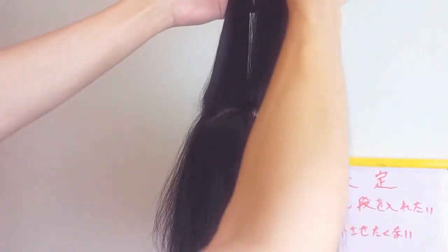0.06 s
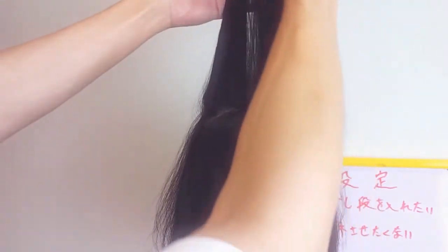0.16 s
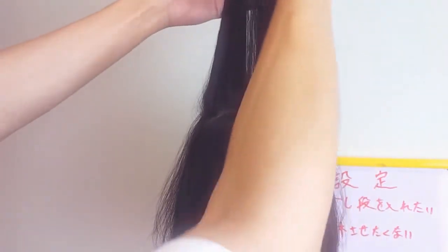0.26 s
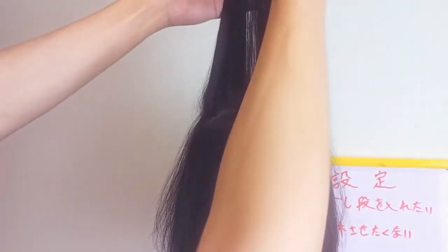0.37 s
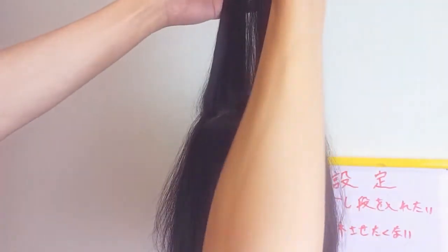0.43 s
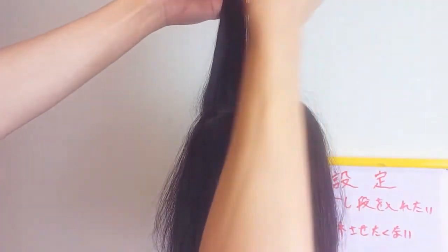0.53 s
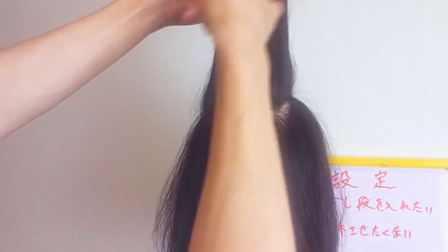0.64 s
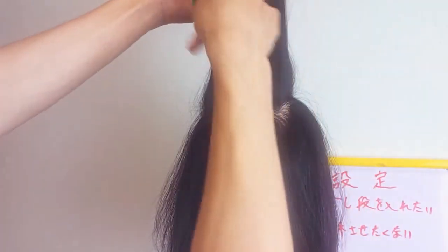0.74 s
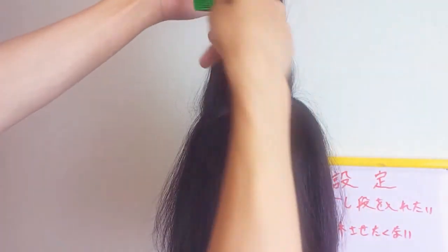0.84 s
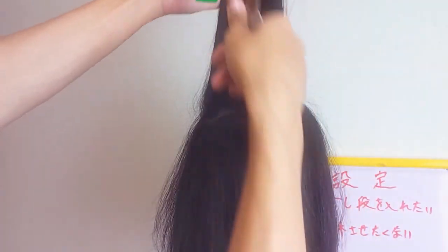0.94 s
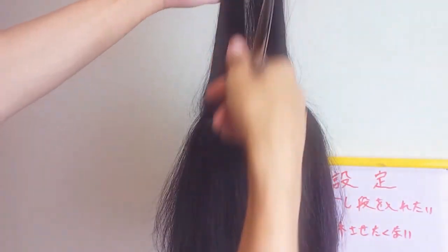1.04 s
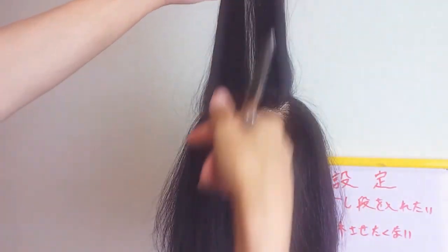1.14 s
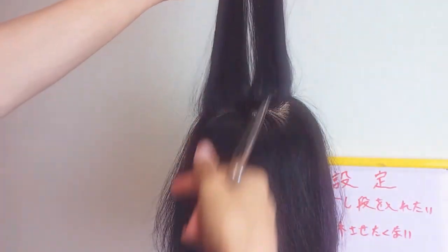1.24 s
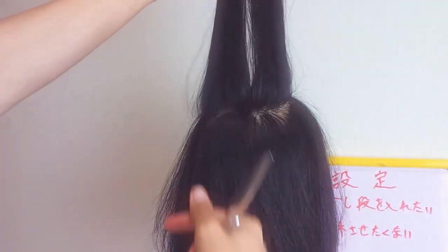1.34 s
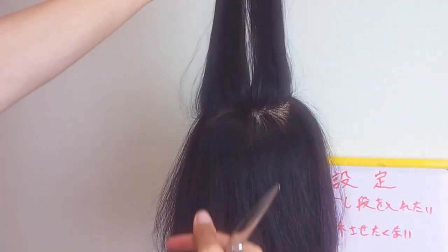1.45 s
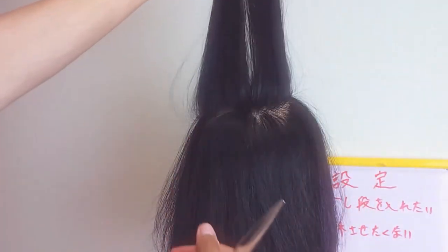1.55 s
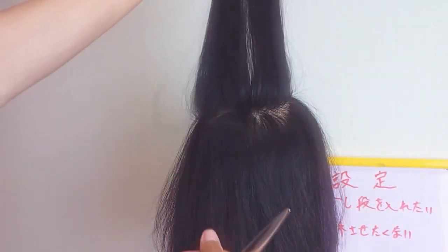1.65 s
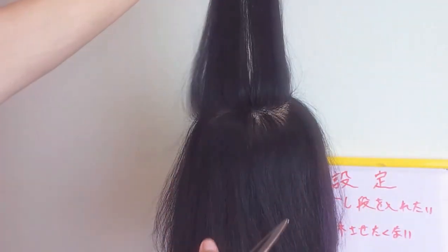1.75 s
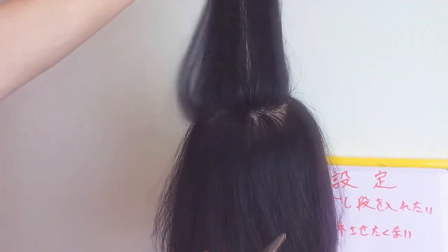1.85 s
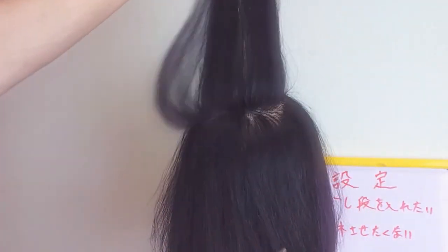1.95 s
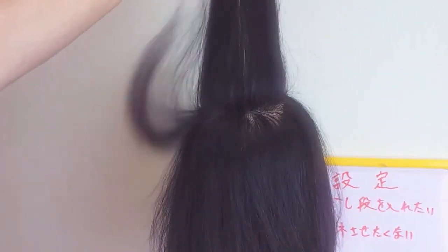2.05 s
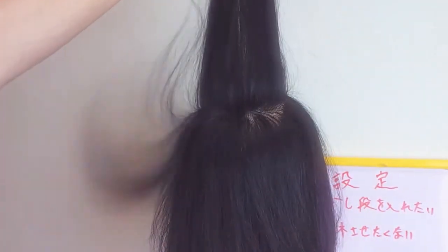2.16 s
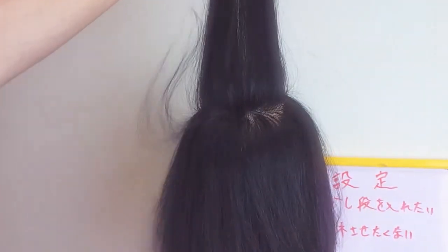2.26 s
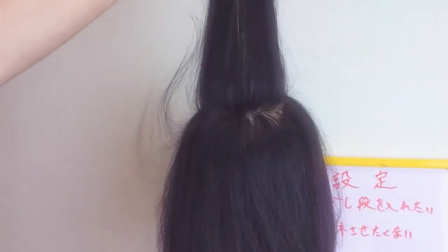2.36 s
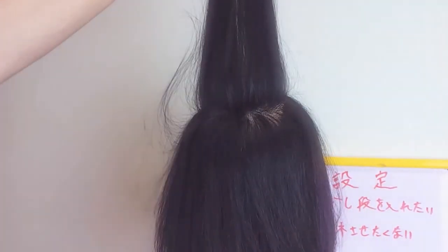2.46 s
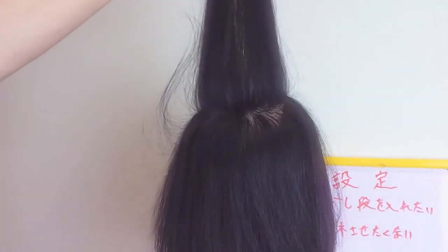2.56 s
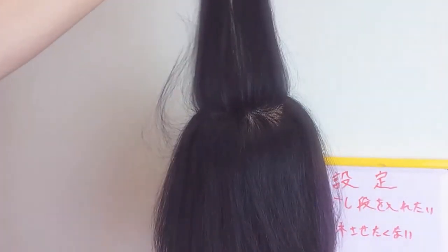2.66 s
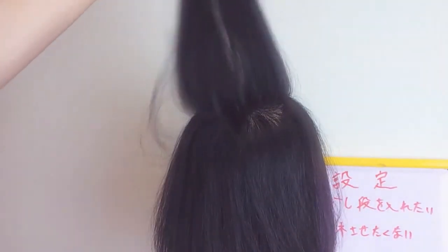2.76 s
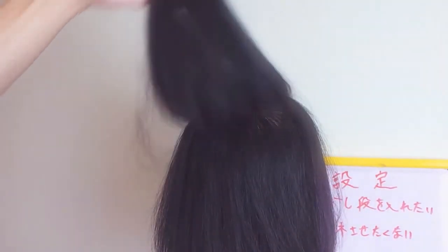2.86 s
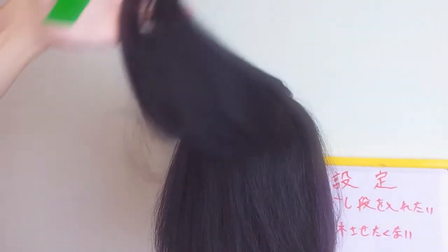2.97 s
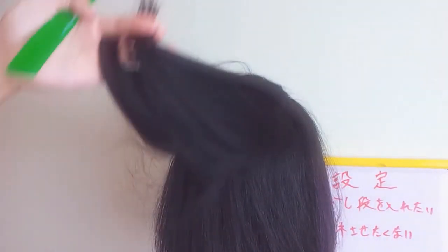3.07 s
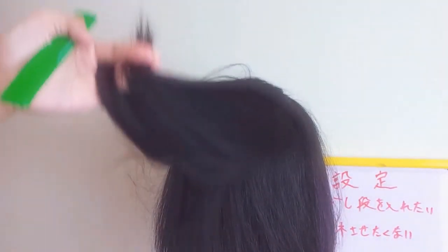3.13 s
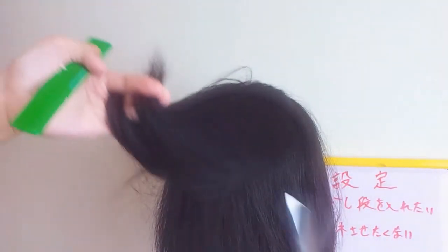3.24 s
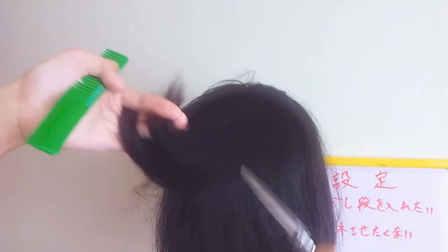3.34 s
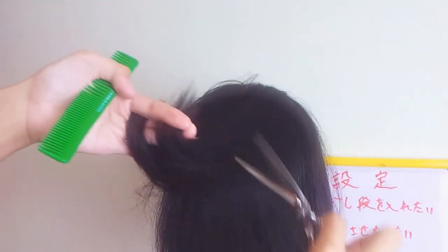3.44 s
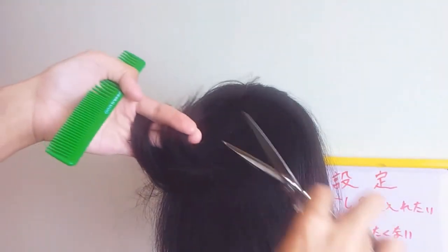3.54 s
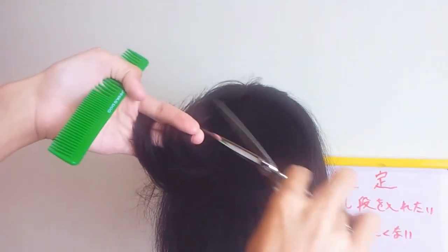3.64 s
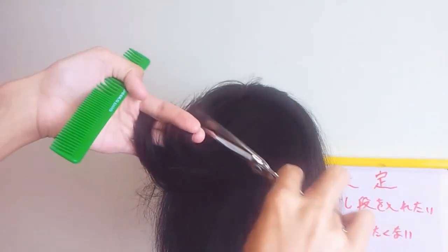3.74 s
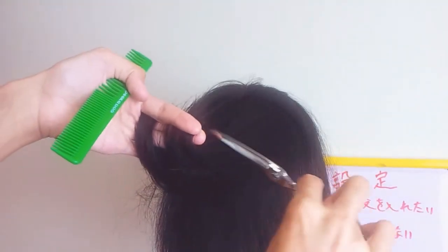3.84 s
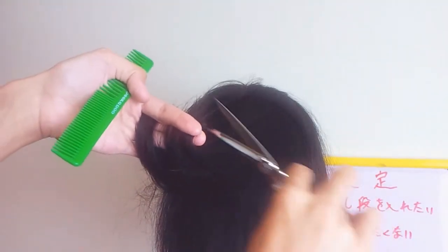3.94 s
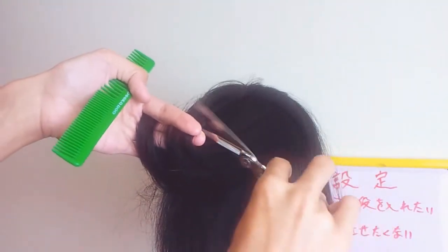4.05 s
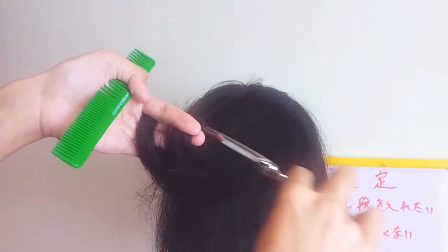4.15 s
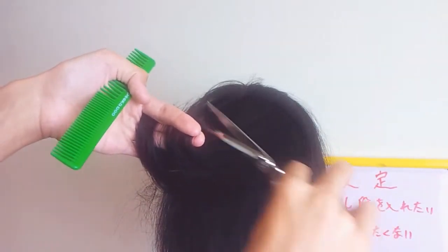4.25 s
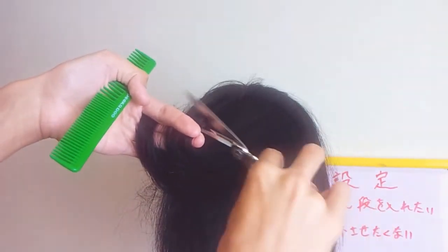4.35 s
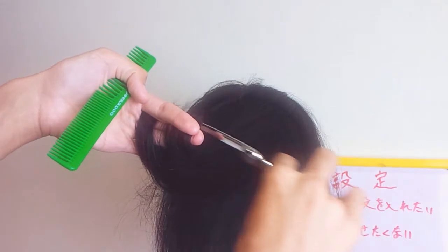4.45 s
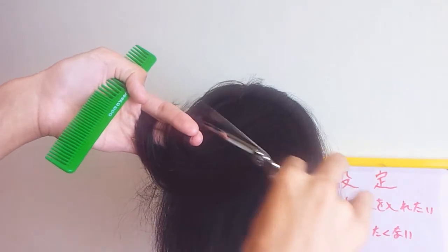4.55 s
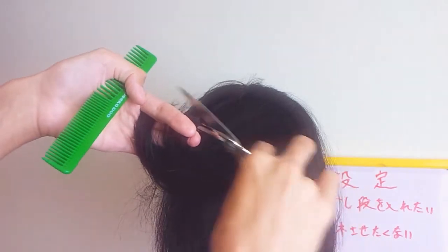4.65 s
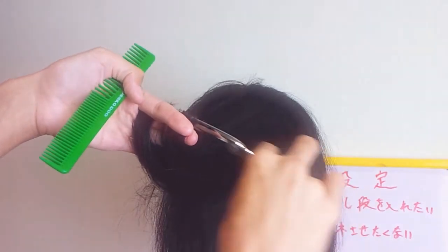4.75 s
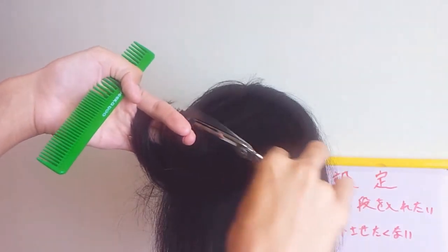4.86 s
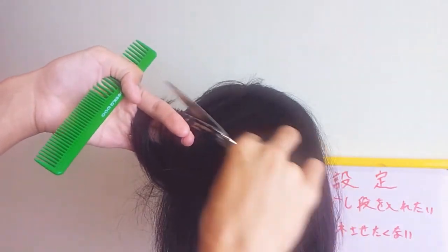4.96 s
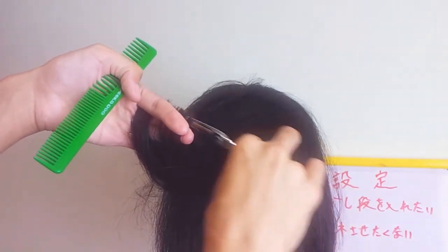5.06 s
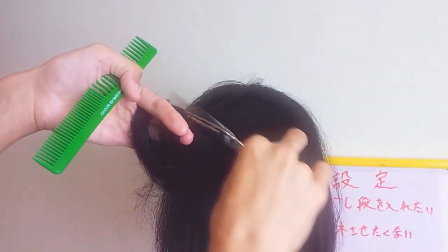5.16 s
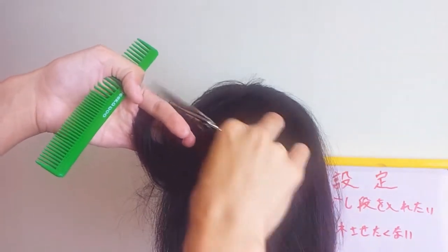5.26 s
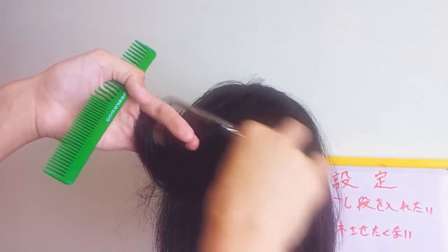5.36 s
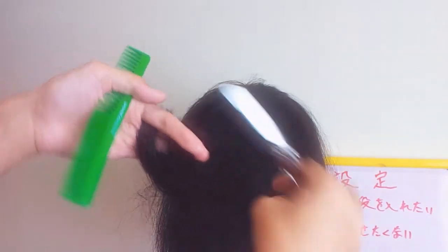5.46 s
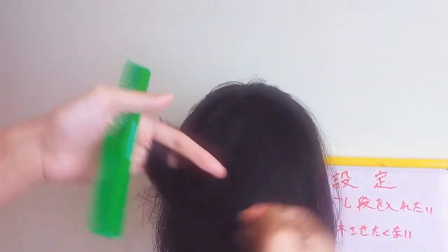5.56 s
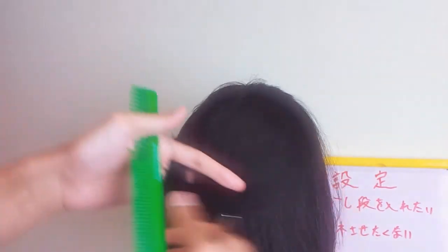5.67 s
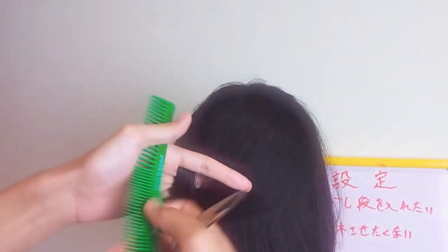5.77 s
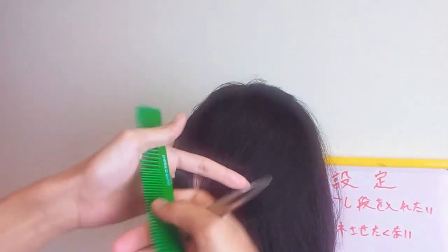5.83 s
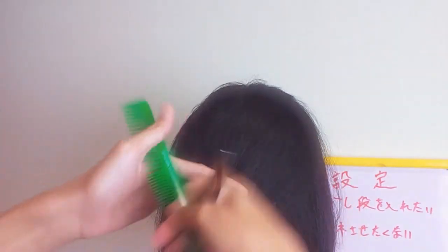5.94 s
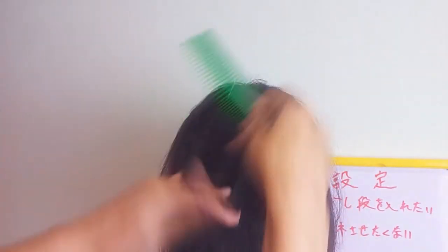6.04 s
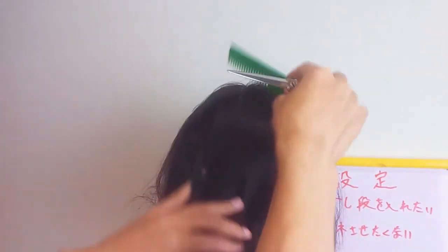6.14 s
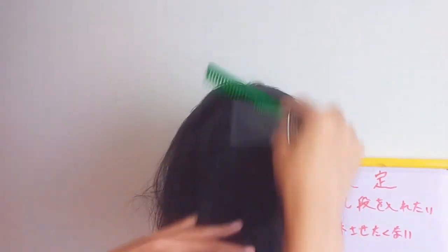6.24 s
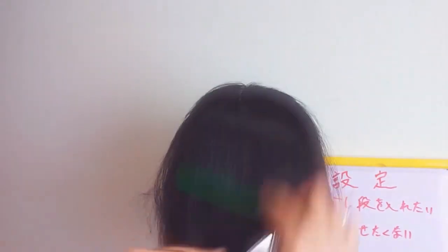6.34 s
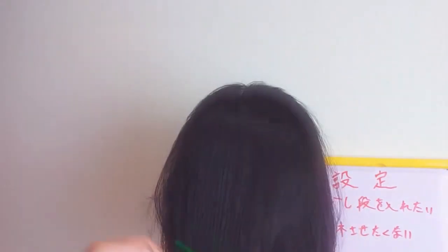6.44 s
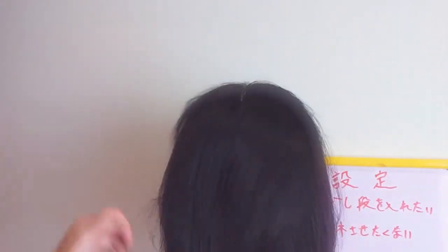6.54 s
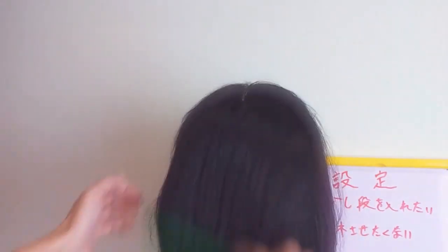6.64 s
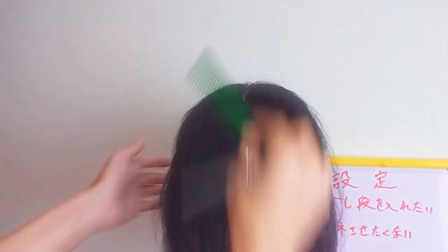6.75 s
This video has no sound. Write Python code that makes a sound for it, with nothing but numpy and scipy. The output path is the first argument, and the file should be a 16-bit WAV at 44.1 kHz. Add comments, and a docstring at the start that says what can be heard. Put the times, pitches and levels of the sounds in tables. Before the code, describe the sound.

Hairdressing scissors snip hair in a quick run of bright clicks, then the handles clack and a comb strokes through twice in a small room.

```python
"""Faint ticks of steel, then a first snip: hairdressing scissors, close to one microphone in a small room.
After a pause seven more snips cut a lifted section of hair, each a short rasp of sliding blades that
ends in a bright click; the room rings on. The loose handles clack, then a comb knocks on the hollow
practice head and is drawn twice through the hair. Far back in the quiet, a fan hums faintly."""
import sys
import numpy as np
from scipy import signal
from scipy.fft import rfft, irfft
from scipy.io import wavfile

SR = 44100
rng = np.random.default_rng(int(sys.argv[2]) if len(sys.argv) > 2 else 0)


def to_wav(s):
    """Save 16-bit WAV."""
    ch = np.atleast_2d(s).T  # columns
    pcm = np.round(np.clip(ch, -1, 1) * 32767)  # PCM
    wavfile.write(sys.argv[1], SR, pcm.astype(np.int16))


N = 299880
TIME = np.arange(N) / SR
BINS = abs(np.fft.fftfreq(4096, 1 / SR))  # frequencies of every filter curve, in Hz


# Snips, close to the microphone. Each row: moment the blades shut in seconds, click level in dB, blade
# pitch in Hz, room and ring relative to the click in dB, shelf above 12 kHz in dB, cutting time in
# seconds, rasp of the edges in dB, crunch of the hair in dB.
SNIPS = [ (0.3902, -27, 8870, 0, -7, 0.0027, -56, -74), (2.8879, -21.5, 11500, -0.5, 1, 0.021, -52.5, -83),
         (3.383, -14, 12120, -6, 4, .029, -43, -61.5), (3.7118, -16, 10950, -7.5, 3.5, 0.024, -40.5, -54.5),
         (4.027, -22, 10750, -6.5, -3, .026, -45, -50), (4.3321, -31, 10240, -8, -3, 0.023, -51, -55),
         (4.627, -20.5, 10750, -5.5, 1, 0.018965, -48, -53),
         (4.885, -30, 10600, -3.5, -0.5, .019, -57, -63)]
# Light touches of the blades. Each row: start in seconds, level in dB, blade pitch in Hz, room and ring
# relative to the touch in dB.
TICKS = [(0.029, -58, 11800, 1), (0.0914, -51.5, 3180, 2), (2.5118, -57, 9830, -12),
         (2.6504, -51.5, 12100, -2), (5.0749, -58, 10800, 5.5), (5.5111, -46, 11090, -4),
         (5.734, -59, 10900, 2)]
# The ring of the blades. Each row: frequency in Hz, relative level in dB, time to fall 60 dB in seconds.
BLADE_MODES = [(6575, -26.5, .18), (8800, -8, 0.3), (9000, -8, 0.25), (9700, -1, .25), (10356, -1, 0.18),
               (10734, -5, 0.33), (11000, -1, .28), (11970, -30, 0.21), (12100, -15, 0.28),
               (12400, -16.5, 0.27), (13090, 3, 0.2), (15000, -16, .19)]

def blade_clicks(chatter_s=0.00053, ring_db=-35, shiver_db=-16, shiver_t60=0.07, echo_db=-8.5):
    """The blades hit their stop, shiver and ring. Returns the close sound and what goes to the room."""
    t = np.arange(SR // 2) / SR
    near, to_room = np.zeros(N), np.zeros(N)
    hits = [(*row[:5], 1, 8) for row in SNIPS] + [(*row, -9, 9, 12) for row in TICKS]
    for start, db, pitch_hz, room_db, top_db, body_db, emphasis_db in hits:
        flex_db = hump(4570, 1700, 1.04 * max(db + 22, 0))  # a snip above -22 dB flexes the whole blade
        curve_db = steel(body_db, top_db) + flex_db + contact_ripple(depth_db=1.9, width_hz=170)
        pitched_db = curve_db + hump(pitch_hz, 380, emphasis_db)
        shiver = unit_rms(colour(rng.standard_normal(len(t)), pitched_db))
        shiver *= gain_of(shiver_db - 60 * t / shiver_t60)
        click = contact(pitched_db, t, chatter_s)
        ringing = gain_of(room_db + ring_db) * ring(BLADE_MODES, t)
        add(near, start, gain_of(db) * (click + shiver + ringing))
        for delay_s in (0.0027, 0.0039):  # small surfaces nearby return mostly treble
            echo = contact(steel(body_db - 9, top_db), t, chatter_s)
            add(near, start + delay_s, gain_of(db + echo_db) * echo)
        add(to_room, start, gain_of(db + room_db) * contact((curve_db + pitched_db) / 2, t, chatter_s))
    return near, to_room


# The colour of the steel from close by. Each row: frequency in Hz, relative level in dB.
STEEL_SPECTRUM = [(300, -41), (1000, -44.5), (1600, -43.5), (2500, -22), (3500, -29), (4200, -22),
                  (5600, -19), (7800, -16.5), (8800, -10.5), (10600, -3), (12000, -9.5), (13500, -3.5),
                  (14300, -7), (16000, -16.5)]
# Broad resonances of the blades. Each row: centre in Hz, half width in Hz, gain in dB.
STEEL_RESONANCES = [(2404, 130, -8), (4330, 140, 4), (5380, 310, 1), (6620, 190, 7), (8920, 140, 7.5),
                    (10980, 135, 4), (12560, 600, 4.5)]

def steel(body_db, top_db):
    """The resonant blades as a curve in dB, with shelves below 8 kHz (body) and above 12 kHz (top)."""
    shelves = curve([(1400, 2.6 * body_db), (5000, body_db), (9000, 0), (11500, 0.0088), (14500, top_db)])
    return curve(STEEL_SPECTRUM) + sum(hump(*row) for row in STEEL_RESONANCES) + shelves


# The blades are drawn open between snips. Each row: start in seconds, level in dB.
OPENINGS = [(2.748, -61.5), (4.443, -63)]

def blade_slides(glide_s=0.036, glide_db=-69, overrun_s=0.0025, opening_s=0.032):
    """The blades glide up to the hair, then crunch and rasp to the click; twice they whisper open."""
    out = np.zeros(N)
    for shut, *_, cut_s, rasp_db, crunch_db in SNIPS:
        edges = gain_of(rasp_db) * edge_rasp(cut_s + overrun_s, growth_db=14)
        hair = gain_of(crunch_db) * hair_crunch(cut_s + overrun_s)
        add(out, shut - cut_s, edges + hair)
        if cut_s > 0.01:  # a nip with the very tips has no run-up
            glide = edge_rasp(glide_s + overrun_s, growth_db=8)
            add(out, shut - cut_s - glide_s, gain_of(glide_db) * glide)
    for start, db in OPENINGS:
        add(out, start, gain_of(db) * edge_rasp(opening_s, growth_db=6))
    return out


def edge_rasp(length_s, growth_db):
    """Edge grinds on edge, harder as the blades move on."""
    snaps, travel = friction(length_s, steel(body_db=-0.86, top_db=0.885))
    return unit_rms(snaps * gain_of(growth_db * travel) * signal.windows.tukey(len(snaps), 0.2))


# Hair parting between the blades. Each row: frequency in Hz, relative level in dB.
CRUNCH_SPECTRUM = [(1000, -51), (2200, -11), (3000, -3), (4500, -9), (6500, 2.5), (8000, -3.5),
                   (10000, -10), (15000, -11)]

def hair_crunch(length_s, bite=0.37):
    """The hair gives way early in the cut, loudest near the fraction `bite` of the travel."""
    snaps, travel = friction(length_s, curve(CRUNCH_SPECTRUM))
    return unit_rms(snaps * travel * np.exp(-travel / bite) * (1 - travel ** 4))


# The handles, near the microphone, loudest as the scissors are folded into the hand.
# Each row: start in seconds, level in dB, rattling time in seconds.
CLACKS = [(0.09, -55, .003), (5.397, -30, 0.01), (5.4915, -54, .002)]
# Handle striking handle. Each row: frequency in Hz, relative level in dB.
CLACK_SPECTRUM = [(500, -36), (1100, -30), (1350, -9), (2300, -16.5), (2800, -9), (5000, -5), (8500, -5),
                  (9700, 0.5), (11500, 1.5), (14000, -11.5), (16000, -16)]
# The loosely held scissors. Each row: frequency in Hz, relative level in dB, time to fall 60 dB in seconds.
SCISSOR_MODES = [(1480, -7, 0.23), (1963, 1, 0.15), (2773.3, 0.5, 0.29), (4650, -13, 0.17), (5540, 3, .18),
                 (7400, 9, 0.23), (9600, -5, .2), (11050, 2, .18), (11494, -1, .16), (12950, -9, .15),
                 (15300, -10, .15)]

def handle_clacks(chatter_s=0.00071, bounce_s=0.0021, rattle_loss_db=27.5, ring_db=-30):
    """The loose handles bounce on each other and set the whole scissors ringing."""
    t, out = np.arange(SR // 2) / SR, np.zeros(N)
    for start, db, rattle_s in CLACKS:
        for late_s in np.arange(0, rattle_s, bounce_s):
            bounce_db = db - rattle_loss_db * (late_s / rattle_s) ** 2
            add(out, start + late_s, gain_of(bounce_db) * contact(curve(CLACK_SPECTRUM), t, chatter_s))
        add(out, start, gain_of(db + ring_db) * ring(SCISSOR_MODES, t))
    return out


# The comb lands on the practice head, close by. Each row: start in seconds, thud in dB, clack in dB,
# pitch of the clack in Hz, tick of the teeth in dB.
KNOCKS = [(5.789, -54.5, -51.5, 1600, -60), (5.8191, -71, -47, 1650, -50), (6.4219, -52.5, -52.5, 660, -68),
          (6.4979, -43, -49, 600, -70.5), (6.5567, -50.5, -44.5, 2900, -42)]
# The hollow head. Each row: frequency in Hz, relative level in dB, time to fall 60 dB in seconds.
HEAD_MODES = [(128, 3.5, 0.1), (170, -1.5, 0.09), (245, 1, 0.097), (570, -3.5, 0.15)]

def comb_knocks(chatter_s=0.00059, thud_rise_s=0.0099, buzz_db=-8, buzz_t60=0.098):
    """The comb lands: the head thuds, the plastic clacks and the teeth tick and buzz."""
    t, out = np.arange(SR // 4) / SR, np.zeros(N)
    for start, thud_db, clack_db, pitch_hz, tick_db in KNOCKS:
        buzz = unit_rms(colour(rng.standard_normal(len(t)), curve(SWISH_SPECTRUM)))
        buzz *= gain_of(buzz_db - 60 * t / buzz_t60)
        thud = ring(HEAD_MODES, t) * (1 - np.exp(-t / thud_rise_s))
        clack = contact(curve(SCRAPE_SPECTRUM) + hump(pitch_hz, 0.28 * pitch_hz, db=12), t, chatter_s)
        tick = contact(curve(SWISH_SPECTRUM), t, chatter_s) + buzz
        add(out, start, gain_of(thud_db) * thud + gain_of(clack_db) * clack + gain_of(tick_db) * tick)
    return out


# Two strokes with a brief touch between them. Each row: start in seconds, time pressed on the head in
# seconds, time drawn in seconds, rubbing of the head in dB, scrape of the teeth in dB.
STROKES = [(5.791, 0.078, .28, -53, -56.5), (6.417, 0.029, 0.02, -50, -60.5), (6.5, 0.05, 0.25, -48, -58)]
# The rubbed head, scraping teeth and swishing hair. Each row: frequency in Hz, relative level in dB.
RUB_SPECTRUM = [(40, -26), (85, -14), (120, -0.5), (165, 0.5), (250, -12), (400, -12), (900, -45)]
SCRAPE_SPECTRUM = [(200, -16), (470, 2), (600, 1.5), (850, 3.5), (1080, -3.5), (1330, 0.5), (1900, -3),
                   (2300, -7.5), (3000, -8), (4200, -11), (9000, -31)]
SWISH_SPECTRUM = [(1000, -36), (3500, -14), (7000, -4.5), (10500, 1.5), (12500, -0.5), (16000, -9)]

def comb_strokes(drag_db=-71, swish_db=-61, pressed_swish_db=-60.5, rub_fade_db_per_s=118):
    """Teeth first press on the head, rubbing and catching on strands, then swish on through free hair."""
    rub = noise(RUB_SPECTRUM)
    scrape = unit_rms(colour(grains(N, per_s=2000, spread_db=0.5), curve(SCRAPE_SPECTRUM)))
    swish = unit_rms(colour(grains(N, per_s=14000, spread_db=1.5), curve(SWISH_SPECTRUM)))
    out = np.zeros(N)
    for start, press_s, draw_s, rub_db, scrape_db in STROKES:
        t = np.maximum(TIME - start, 0)
        pressed, drawn = comb_grip(t, press_s), comb_grip(t, draw_s)
        out += rub * drawn * gain_of(rub_db - rub_fade_db_per_s * t)
        out += scrape * np.hypot(gain_of(scrape_db) * pressed, gain_of(drag_db) * drawn)
        out += swish * np.hypot(gain_of(pressed_swish_db) * pressed, gain_of(swish_db) * drawn)
    return out


def comb_grip(t, hold_s, attack_s=0.023, lift_db_per_s=223):
    """The level rises as the teeth sink in, holds, and falls as they let go."""
    return np.clip(t / attack_s, 0, 1) * gain_of(-lift_db_per_s * np.maximum(t - hold_s, 0))


def room(x, first_s=0.0039, build_s=0.00042):
    """Dense reflections off the walls of a small room; bass and high treble die soonest."""
    hz, t, spectra = signal.stft(rng.standard_normal(SR // 2), SR, nperseg=256)
    t60 = curve([(200, 0.18), (4000, 0.34), (10000, 0.32), (15000, 0.24)], hz)[:, None]
    level_db = curve([(200, 1.3), (1400, 2.2), (3000, -3.0), (6000, -3.5), (9500, 0.6)], hz)[:, None]
    tail = signal.istft(spectra * gain_of(level_db - 60 * t / t60), SR, nperseg=256)[1]
    tail *= 1 - np.exp(-np.maximum(TIME[:len(tail)] - first_s, 0) / build_s)
    return signal.fftconvolve(x, tail / np.linalg.norm(tail))[:N]


# A fan, far back in the room. Each row: frequency in Hz, relative level in dB.
FAN_TONES = [(145.3, -84.5), (231.5, -79.5), (312.2, -76.5), (457.6, -81), (694.4, -83.5), (925.9, -82.5),
             (1588, -87.5)]

def fan_hum(gain_db=-1, waver_hz=5):
    """The fan hums in wavering tones, each a narrow band of noise."""
    hz, out = np.fft.rfftfreq(N, 1 / SR), np.zeros(N)
    for tone_hz, db in FAN_TONES:
        band = rfft(rng.standard_normal(N)) / (1 + ((hz - tone_hz) / waver_hz) ** 2)
        out += gain_of(db + gain_db) * unit_rms(irfft(band, N))
    return out


# The quiet room at the microphone. Each row: frequency in Hz, relative level in dB.
AIR_SPECTRUM = [(25, -33), (55, -15.5), (90, -12), (140, -9), (290, -5.5), (400, -9), (700, -9.5),
                (950, -12.5), (1200, -16.5), (2000, -20), (6500, -21.5), (10500, -16), (13000, -18.5),
                (15800, -21.5)]

def room_tone(db=-65.5):
    """Steady air in the room and the microphone's own hiss."""
    return gain_of(db) * noise(AIR_SPECTRUM)


def contact(curve_db, t, chatter_s):
    """A brief chatter of two hard surfaces, with the energy of 2 ms at rms 1."""
    swell = t / chatter_s * np.exp(-t / chatter_s)
    burst = rng.standard_normal(len(t)) * swell
    for _ in range(2):  # so short a contact holds all frequencies alike
        flat_spectrum = np.exp(1j * np.angle(rfft(burst)))
        burst = irfft(flat_spectrum, len(t)) * np.sqrt(swell)
    burst = colour(burst, curve_db)
    return burst / np.linalg.norm(burst) * np.sqrt(0.002 * SR)


def friction(length_s, curve_db):
    """Sliding makes dense tiny snaps. Returns them and how far the blades have travelled (0-1)."""
    size = max(round(length_s * SR), 64)
    snaps = grains(size, per_s=9000, spread_db=0.5)
    return colour(snaps, curve_db + contact_ripple(depth_db=4.5, width_hz=200)), np.linspace(0, 1, size)


def contact_ripple(depth_db, width_hz):
    """Each contact point favours other resonances: a random ripple in dB at BINS."""
    hz = np.linspace(0, SR / 2, 2048)
    bell = np.exp(-((hz - hz.mean()) / width_hz) ** 2)
    ripple = signal.fftconvolve(rng.standard_normal(len(hz)), bell, "same")
    return depth_db * unit_rms(np.interp(BINS, hz, ripple))


def ring(modes, t):
    """Decaying modes, each struck at a random phase."""
    return sum(gain_of(db - 60 * t / t60) * np.sin(2 * np.pi * (hz * t + rng.random()))
               for hz, db, t60 in modes)


def grains(size, per_s, spread_db):
    """Tiny snaps at random moments, a few larger than the rest."""
    heights = gain_of(spread_db * np.minimum(rng.exponential(1, size), 4))
    return heights * rng.standard_normal(size) * (rng.random(size) < per_s / SR)


def noise(spectrum):
    """Steady noise with the given spectrum, at rms 1."""
    gains = gain_of(curve(spectrum, np.fft.rfftfreq(N, 1 / SR)))
    return unit_rms(irfft(rfft(rng.standard_normal(N)) * gains, N))


def colour(x, curve_db):
    """Minimum-phase filter with the given gain at BINS."""
    log_gain = np.log(gain_of(np.maximum(curve_db, -100)))
    taps = np.fft.ifft(np.exp(np.conj(signal.hilbert(log_gain)))).real
    return signal.fftconvolve(x, taps[:len(taps) // 2])[:len(x)]


def hump(hz, half_width_hz, db):
    """One broad resonance, in dB at BINS."""
    return db / (1 + ((BINS - hz) / half_width_hz) ** 2)


def curve(points, hz=BINS):
    """Joins the points on a log-frequency axis."""
    point_hz, values = np.transpose(points)
    return np.interp(np.log(hz + 1), np.log(point_hz + 1), values)


def gain_of(db):
    """Decibels to amplitude."""
    return 10 ** (np.asarray(db) / 20)


def unit_rms(x):
    """Scales to rms 1."""
    return x / np.sqrt(np.mean(x ** 2) + 1e-20)


def add(mix, start_s, sound):
    """Mixes a sound in at start_s."""
    part = mix[max(round(start_s * SR), 0):][:len(sound)]
    part += sound[:len(part)]


def scene(slide_room_db=-4, clack_room_db=-4, comb_room_db=-6):
    """Scissors and comb close to one microphone, the room and the fan behind them."""
    clicks, to_room = blade_clicks()
    slides, clacks, comb = blade_slides(), handle_clacks(), comb_knocks() + comb_strokes()
    to_room += gain_of(slide_room_db) * slides + gain_of(clack_room_db) * clacks
    to_room += gain_of(comb_room_db) * comb
    return (clicks + slides + clacks + comb + room(to_room) + fan_hum() + room_tone())[None]


def record(dry):
    """The recorder's band ends just above 16 kHz."""
    lowpass = signal.firwin(301, 16150, window=("kaiser", 8), fs=SR)
    return signal.oaconvolve(dry, lowpass[None], "same")


dry = scene()
out = record(dry)
to_wav(out)
```